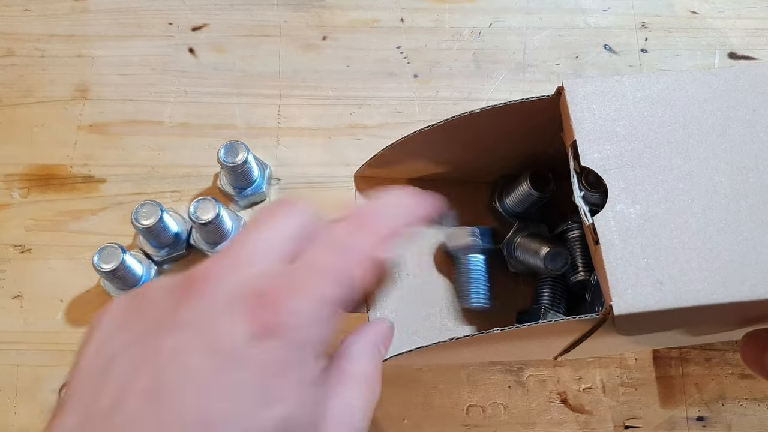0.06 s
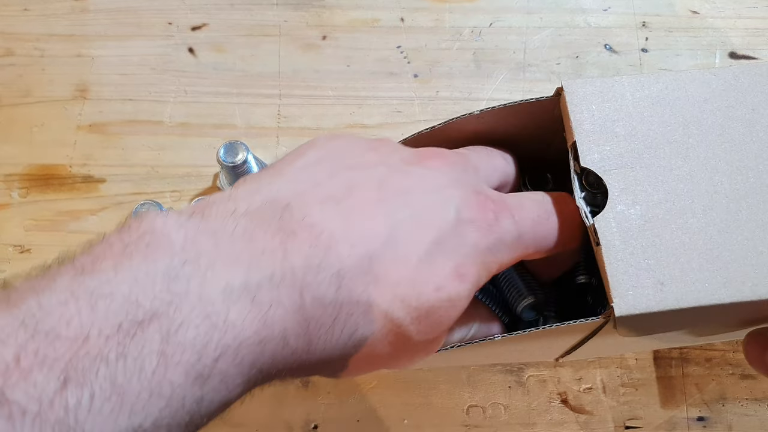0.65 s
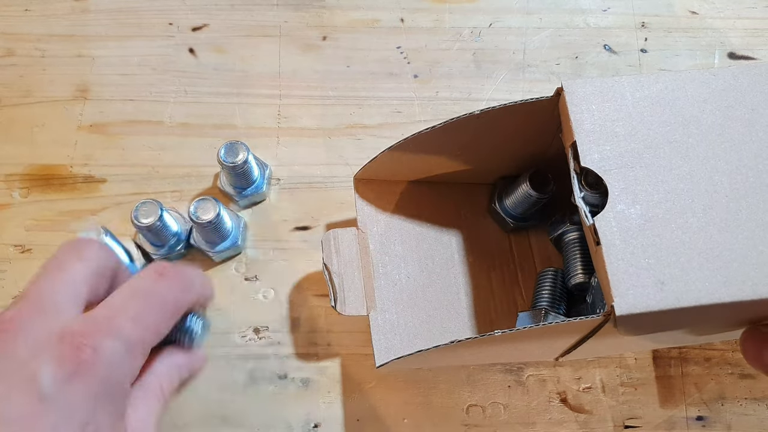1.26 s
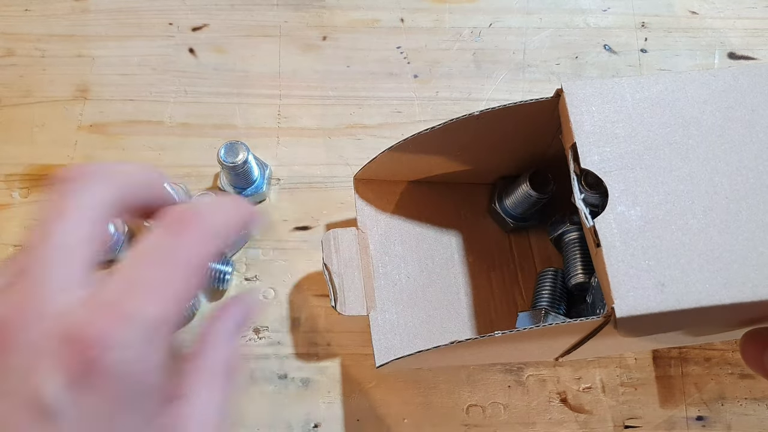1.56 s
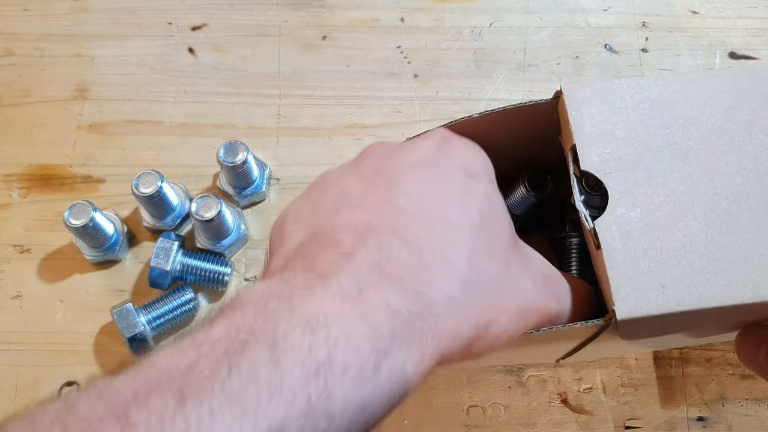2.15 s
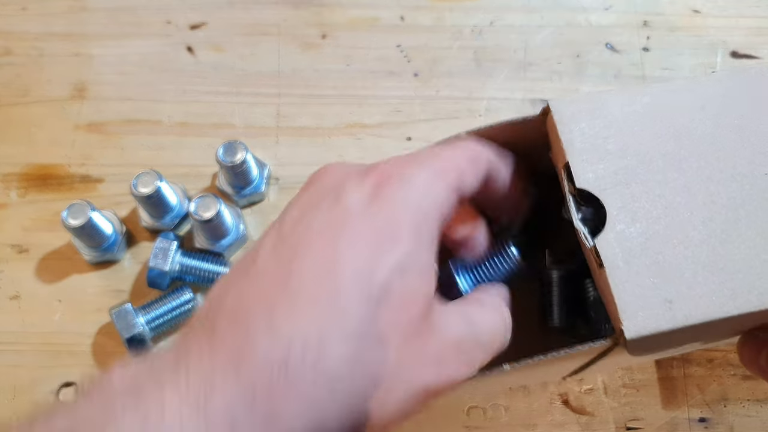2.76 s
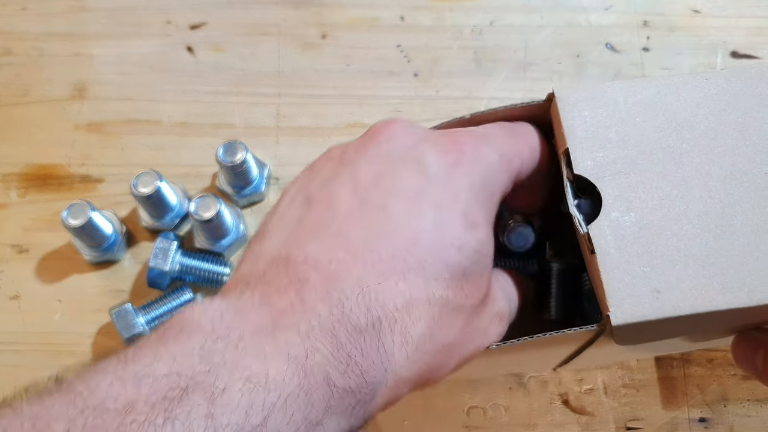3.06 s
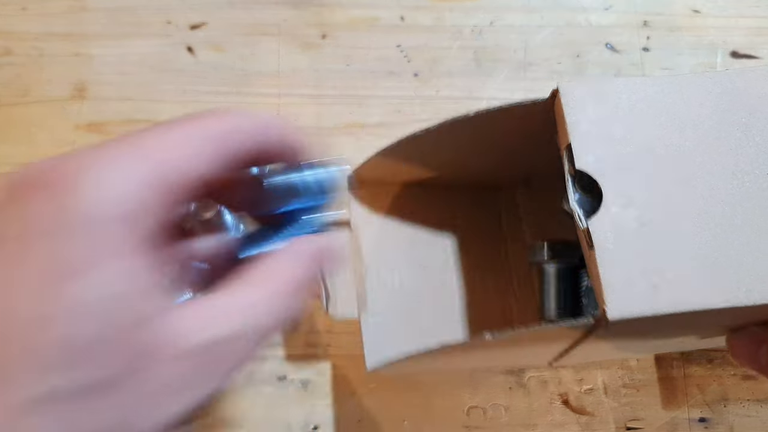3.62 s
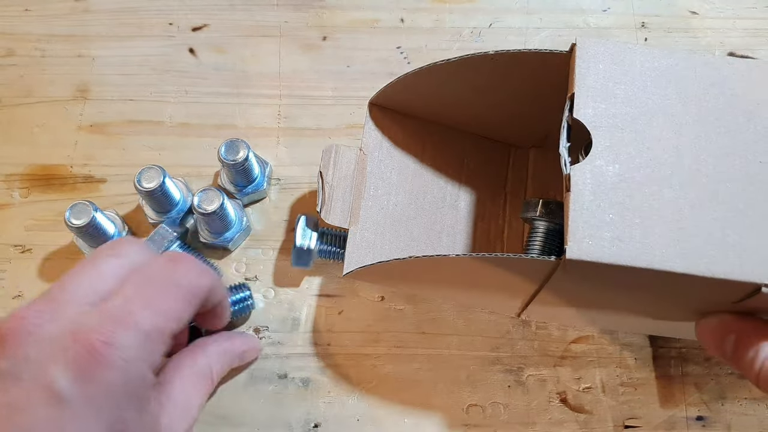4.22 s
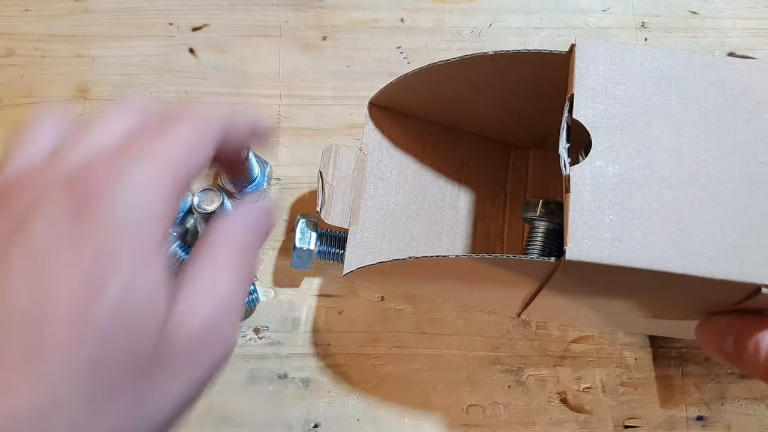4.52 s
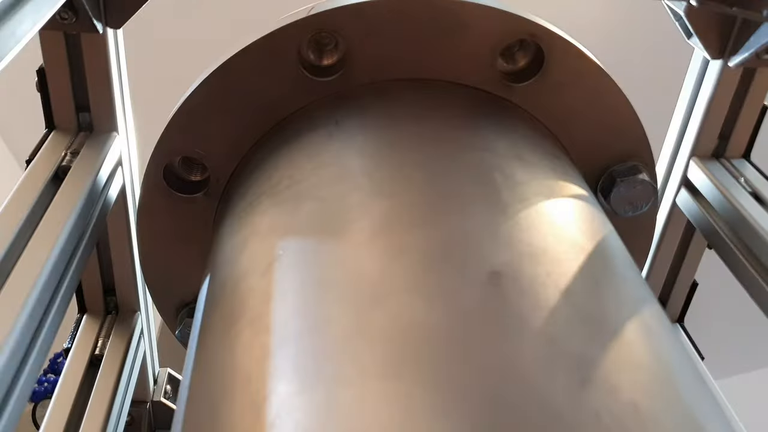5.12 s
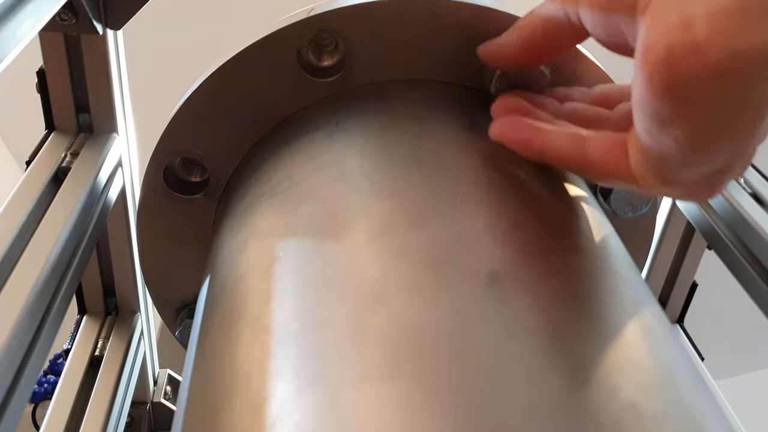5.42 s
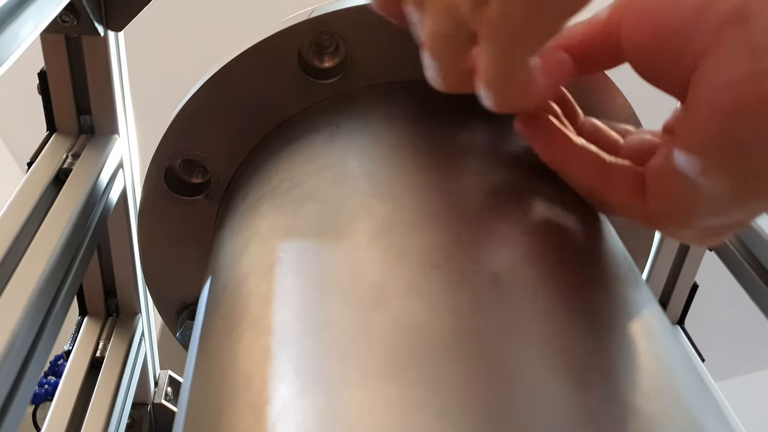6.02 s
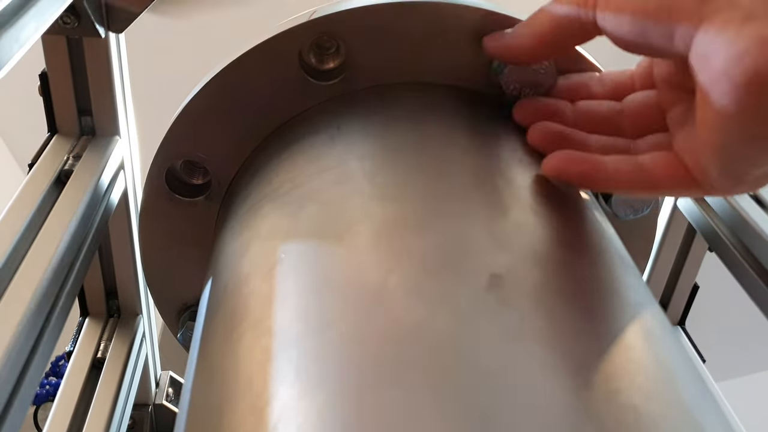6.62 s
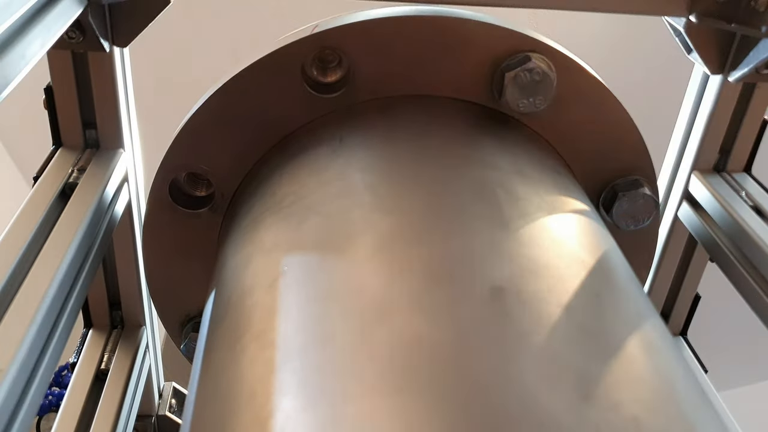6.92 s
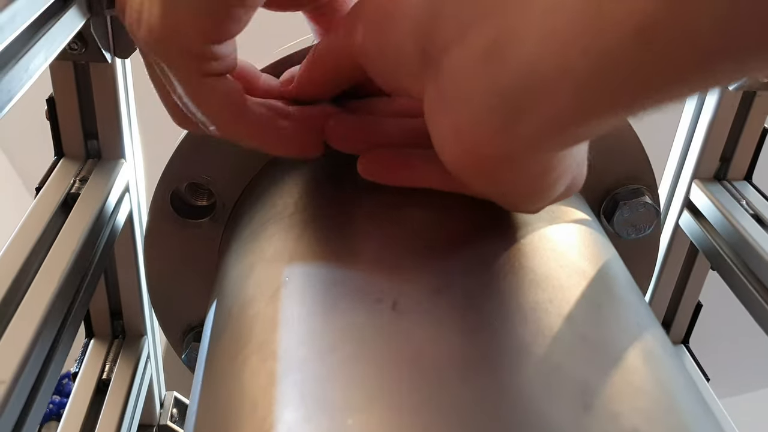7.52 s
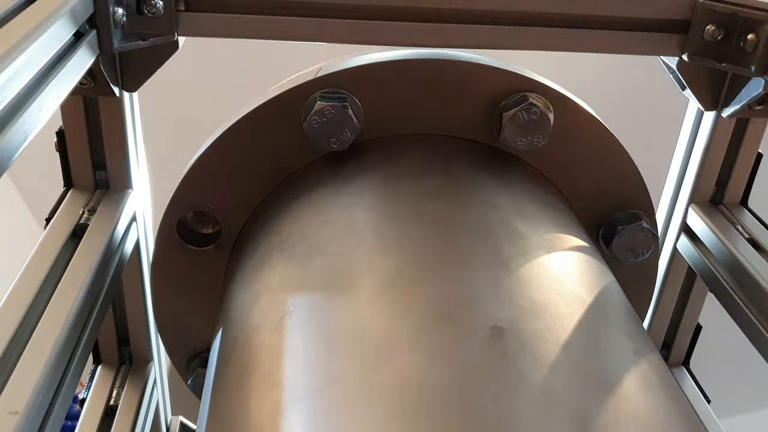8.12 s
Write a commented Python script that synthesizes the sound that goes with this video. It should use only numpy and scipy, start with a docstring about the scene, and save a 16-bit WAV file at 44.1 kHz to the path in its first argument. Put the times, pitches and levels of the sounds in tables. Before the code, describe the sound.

Heard close up in stereo, steel bolts scrape on cardboard and knock together as they are picked from a box, then thud onto a wooden workbench in two batches. Next, fingers screw a bolt into a steel flange: the dry thread rasps, rings the metal lightly and gives short, high squeaks as it sticks and slips. The quiet workshop sound ends on a split second of cordless drill whine.

```python
"""A quiet workshop, a stereo microphone close to the wooden bench.
A hand rummages for steel bolts in a cardboard box: they scrape and clack, the box walls rumble.
Set down, the bolts thud and ring the bench. Then one is turned by hand into a steel flange:
its thread rasps, rings the flange and squeaks as it sticks and slips.
At the very end a cordless drill starts to whine."""
import sys
import numpy as np
from scipy import signal
from scipy.fft import rfft, irfft, next_fast_len
from scipy.io import wavfile
from scipy.ndimage import uniform_filter1d

SR = 44100
rng = np.random.default_rng(int(sys.argv[2]) if len(sys.argv) > 2 else 0)


def master(y):
    """Save y as 16-bit WAV."""
    cut = np.clip(np.atleast_2d(y).T, -1, 1)
    pcm = np.round(cut * 32767)  # scale
    wavfile.write(sys.argv[1], SR, pcm.astype(np.int16))


N = 364690
TIME = np.arange(N) / SR

# hand strokes, plus the low rumble of a bolt rocking on the bench at 1.66 s:
# start/s, length/s, scrape/dB, rumble/dB, hiss/dB
MOVEMENTS = [(0.021, 0.023, -33, -49, -51), (0.104, 0.095, -33, -45.5, -55),
             (0.203, 0.053, -38, -39.5, -52.5), (0.44, .05, -44.5, -50.5, -74),
             (0.513, .055, -37, -38.5, -52.5), (.635, .12, -33, -40.5, -50.5),
             (0.847, .14, -37.5, -46, -53), (1.112, 0.016, -50, -52, -66.5),
             (1.357, 0.057, -48.5, -38, -67), (1.531, .08, -46.5, -49.5, -72), (1.66, .13, -75, -53.5, -94),
             (1.879, 0.19, -43, -45, -54.5), (2.177, .18, -43.5, -43, -61), (2.42, .2, -35, -41, -58),
             (2.64, 0.17, -37.5, -34, -49), (2.877, .15, -43.5, -39, -54.5), (3.079, .3, -44.5, -46, -60.5),
             (3.449, .12, -54.5, -53, -63), (3.665, 0.07, -51, -57, -64), (3.767, .16, -51.5, -58, -54),
             (4.026, 0.024, -46, -58, -68), (4.131, 0.025, -44, -48, -53.5),
             (4.196, .14, -54, -58.5, -76.5), (4.506, 0.021, -51.5, -58.5, -61.5),
             (4.708, .03, -52.5, -54, -61), (4.895, 0.047, -58, -57, -71.5)]
# likeness of left and right at the microphone: f/Hz, correlation
STEREO_LIKENESS = [(60, 0.97), (200, 0.95), (400, 0.92), (800, .45), (2400, 0.32), (5000, 0.24),
                   (12000, 0.087)]


def rummage(grain_db=4, clump_db=1.5, lump_db=3):
    """Threads catch on cardboard in clumps of tiny slips; skin hisses, box or bench rumbles."""
    # spectra of steel on cardboard, of the low rumble and of sliding skin: f/Hz, level/dB
    scrape_colour = [(150, -30.5), (350, -16), (680, -8.5), (1100, -1.5), (1650, -2), (2400, -3),
                     (3500, -4.5), (6000, -20.5), (12000, -39.5)]
    rumble_colour = [(20, -10.5), (60, -3.5), (105, 5), (175, -6.5), (250, -7), (360, -1), (500, -16.5),
                     (680, -2), (1400, -40.5)]
    hiss_colour = [(2000, -21.5), (5000, -1.5), (8000, -5), (12000, -9), (16000, -10.5)]
    scrape_db, rumble_db, hiss_db = movement_levels()
    pressure = np.clip((scrape_db + 63) / 20, 0, 1)  # a light touch slides smoothly
    slips = amp(pressure * (grain_db * wander(N, 900) + clump_db * wander(N, 70)))
    slips /= np.sqrt(uniform_filter1d(slips ** 2, size=8000))
    scrape = evened(hollow(coloured(noise(N) * slips, scrape_colour)))
    rumble = evened(coloured(noise(N) * amp(lump_db * wander(N, 50)), rumble_colour))
    hiss = evened(coloured(noise(N) * np.sqrt(slips), hiss_colour))
    return amp(scrape_db + .5) * scrape + amp(rumble_db + .5) * rumble + amp(hiss_db + 3.5) * hiss


def movement_levels(rise_db_per_s=648.5, fall_db_per_s=270, sag_db=0.5):
    """Scrape, rumble and hiss in dB: a movement sets in fast, holds nearly level and dies away."""
    start, length, *levels = np.transpose(MOVEMENTS)[:, :, None]
    t = TIME[::64]
    arch = np.sin(np.pi * np.clip((t - start) / length, 0, 1)) - .5
    before, after = np.maximum(start - t, 0), np.maximum(t - start - length, 0)
    shape_db = -sag_db * arch - rise_db_per_s * before - fall_db_per_s * after
    return [np.interp(TIME, t, (db + shape_db).max(0)) for db in levels]


def hollow(x, patch_db=3.5):
    """The moving hand keeps reshaping the cavity of the box, so its resonances come and go."""
    spectra = signal.stft(x, SR, nperseg=1024, noverlap=768)[2]
    patches = uniform_filter1d(rng.standard_normal(spectra.shape[1:]), size=4, axis=0)
    patches = evened(uniform_filter1d(patches, size=16, axis=1))
    return signal.istft(spectra * amp(patch_db * patches), SR, nperseg=1024, noverlap=768)[1][:, :N]


def clacks():
    """Bolts knock together, well damped: a dry clack, a low thump and a steel tick."""
    # bolts knocking together; the last is a lone steel click before the threading starts:
    # t/s, clack/dB, thump/dB, tick/dB
    knocks = [(0.138, -24.5, -59, -52), (.18, -19.5, -29.5, -19), (0.4438, -26.5, -55, -51),
              (.48, -30.5, -29.5, -40.5), (0.5238, -21, -44, -36), (0.6735, -6.5, -48.5, -26.5),
              (0.711, -11.5, -57, -40), (.7411, -20.5, -49, -36), (0.95, -13.5, -37, -36.5),
              (0.9623, -13, -29.5, -56), (0.9693, -12.5, -53.5, -34), (1.923, -21.5, -30.5, -42.5),
              (2.175, -23.5, -35, -40), (2.2279, -23, -23.5, -36), (2.3288, -26.5, -30, -38),
              (2.4007, -18.5, -29, -35), (2.4592, -18, -54, -38), (2.4999, -18, -20, -56),
              (2.567, -16, -36.5, -37), (2.6459, -19, -17, -22), (2.6599, -25, -20.5, -30),
              (2.759, -20, -21, -48), (2.9464, -20.5, -27.5, -57), (3.02, -26, -20, -36),
              (3.1024, -18, -32.5, -33), (3.211, -26.5, -23, -50), (3.3375, -23.5, -32, -38),
              (5.0454, -24, -41, -22.5)]
    clack_colour = [(300, -23), (800, -5), (1600, -1), (2300, 0), (3500, -3), (6000, -18),
                    (12000, -45.5)]
    thump_colour = [(35, -14.5), (100, 4), (170, -8), (350, 2.5), (700, -2), (1300, -9.5), (3000, -46)]
    tick_colour = [(2000, -28.5), (4500, -4.5), (6300, 0.5), (10000, -11), (16000, -22.5)]
    out, t = np.zeros((2, N)), np.arange(SR // 5) / SR
    for s, clack_db, thump_db, tick_db in knocks + jostles():
        clack = burst(t, clack_colour, t60=0.0072, scatter_db=-1.5, scatter_t60=0.095)
        thump = burst(t, thump_colour, t60=0.066, scatter_db=-18, scatter_t60=0.19)
        tick = burst(t, tick_colour, t60=0.0083, scatter_db=-11.5, scatter_t60=0.084)
        add(out, s, amp(clack_db - 7.5) * clack + amp(thump_db - 5) * thump + amp(tick_db - 2) * tick)
    return out


def jostles(per_s=9, spread_db=0.5):
    """Small knocks at random moments of the longer movements, following the level of the scrape."""
    above_scrape_db = np.array([13.5, -4, 6])  # clack, thump, tick
    knocks = []
    for start, length, scrape_db, *_ in MOVEMENTS:
        for _ in range(int(length * per_s)):
            s = start + length * rng.random()
            levels = scrape_db + above_scrape_db + spread_db * rng.uniform(-1, 1, 3)
            knocks.append((s, *levels))
    return knocks


def landings(spread_db=2, phase_spread=0.37, attack_s=0.00056):
    """Bolts thud into the bench and ring it; a hard blow reaches the upper modes, and steel ticks."""
    # bolts landing on the bench: t/s, thud/dB, knock/dB, tick/dB
    blows = [(1.339, -19, -23.5, -48), (1.35, -19, -27, -40.5), (1.414, -27, -44, -56),
             (1.48, -12.5, -25.5, -41.5), (1.519, -26, -51, -35.5), (1.558, -16, -32, -32.5),
             (1.595, -22, -45, -57), (3.986, -28.5, -29.5, -36), (4.123, -21, -38, -29),
             (4.167, -12.5, -11, -37), (4.212, -8.5, -12.5, -45), (4.255, -16.5, -19.5, -56),
             (4.28, -22.5, -36, -64), (4.322, -13.5, -17.5, -51)]
    # modes of the wooden bench: f/Hz, level/dB, t60/s
    bench_modes = [(104, -7, .25), (242, -7, .14), (300, -5, .17), (345, -1, .14), (366, -4, .27),
                   (485, -4, .12), (600, -4, .17), (672, -3, .17), (719, 0, .19), (868, -6, .16),
                   (914, -5, .17), (1096, -4, .14), (1360, -10, .12), (1621, -12, .12), (2040, -16, .12)]
    push_colour = [(40, -23.5), (100, -4.5), (190, -2.5), (380, 2), (650, -7.5), (1200, -23.5),
                   (3000, -54)]
    crack_colour = [(150, -11.5), (500, 6), (1100, 7), (2000, -8), (3500, -17.5), (8000, -44.5)]
    tick_colour = [(1500, -12.5), (3500, 3), (6000, 3), (8300, -2.5), (10500, -12.5), (16000, -31.5)]
    out, t = np.zeros((2, N)), np.arange(SR // 2) / SR
    hz, db, t60 = np.transpose(bench_modes)[:, :, None]
    upper = hz[:, 0] > 690
    envelope = amp(-60 * t / t60) * (1 - np.exp(-t / attack_s))
    for s, thud_db, knock_db, tick_db in blows:
        contact = amp(db + spread_db * rng.standard_normal(hz.shape)) * rng.choice([-1, 1], hz.shape)
        phase = phase_spread * rng.standard_normal((2, len(hz), 1)) * np.sqrt(hz / 700)
        rings = contact * envelope * np.sin(2 * np.pi * hz * t + phase)
        push = burst(t, push_colour, t60=0.055, scatter_db=-11, scatter_t60=0.24)
        crack = burst(t, crack_colour, t60=0.027, scatter_db=-4.5, scatter_t60=0.23)
        tick = burst(t, tick_colour, t60=0.011, scatter_db=-5.5, scatter_t60=0.23)
        thud = amp(-7.5) * peaked(rings[:, ~upper].sum(1)) + amp(-4.5) * push
        knock = amp(-10) * peaked(rings[:, upper].sum(1)) + amp(-1.5) * crack
        add(out, s, amp(thud_db) * thud + amp(knock_db) * knock + amp(tick_db + 2.5) * tick)
    return out


def rasps(grain_db=4, drag_db=-62, drag_s=0.11):
    """Each catch of the thread is a swell of tiny slips; afterwards the bolt slides on lightly."""
    # the thread catching hard in the flange: t/s, level/dB, length/s, tilt/(dB per octave)
    catches = [(5.095, -42, 0.023, 16), (5.157, -57, 0.029, 7), (5.268, -18, 0.015, 4.5),
               (5.301, -36, 0.013, -3), (5.325, -25, 0.0082, -1.5), (5.348, -41, 0.012, -3),
               (5.397, -45, .02, 0), (5.445, -53, 0.016, 8.5), (5.535, -53, 0.013, -14.5),
               (5.599, -44.5, 0.016, -3.5), (5.638, -37, 0.021, -2), (5.7, -36, 0.014, -6.5),
               (5.845, -46, 0.0088, 0.5), (5.92, -31, 0.011, 8), (5.97, -45, 0.07, -5),
               (6.102, -39.5, 0.041, -.5), (6.135, -42.5, 0.06, -3), (6.198, -49, 0.018, -2.5),
               (6.254, -42, 0.0092, -6), (6.321, -51, 0.016, -1), (6.397, -43, 0.0092, -4.5),
               (6.451, -41, 0.026, 3.5), (6.528, -53, 0.011, 3), (6.585, -45.5, 0.01, 2),
               (6.67, -43.5, 0.014, -2), (6.752, -47, 0.033, -2), (7.073, -31, 0.023, 0.5),
               (7.115, -41, 0.016, -4), (7.144, -41, .018, 7.5), (7.231, -47, 0.0085, -11.5),
               (7.341, -40, 0.015, 0), (7.434, -30.5, 0.013, -2), (7.624, -50, 0.013, 1),
               (7.773, -35.5, .009, 2.5), (7.806, -35.5, 0.031, -0.5), (7.846, -39.5, 0.0074, -4.5),
               (7.894, -33, 0.02, -3.5), (7.951, -36.5, 0.021, -2.5), (7.98, -38, 0.023, -6.5),
               (7.994, -25, 0.014, 8.5), (8.067, -40, .009, 1.5)]
    out, t = np.zeros((2, N)), np.arange(-SR // 10, SR // 5) / SR
    for s, db, length, tilt in catches:
        slips = wide_noise(len(t)) * swell(t, length) * amp(grain_db * wander(len(t), 1200))
        rasp = peaked(tilted(flange(slips), tilt), size=350)
        slide = wide_noise(len(t)) * swell(t, drag_s) * (t > 0) * amp(grain_db * wander(len(t), 100))
        drag = peaked(coloured(flange(slide), [(1300, -2.5), (12000, -18.5)]))
        add(out, s + t[0], amp(db + 2.5) * rasp + amp(drag_db) * drag)
    return out


def turning(fade_s=0.012, jerks_per_s=59.35, jerk_db=10, grain_db=4, squeal_above=0.17, rub_db=-66.5):
    """Fingers turn the bolt: the thread scrapes finely in jerks and sings only in the harder ones."""
    # turns of the bolt: start/s, end/s, scrape/dB, squeal/dB
    turns = [(5.343, 5.468, -54, -51), (5.517, 5.73, -57.5, -61), (5.82, 6.046, -54.5, -50),
             (6.07, 6.283, -54, -51), (6.38, 6.852, -59.5, -72), (7.259, 7.461, -52.5, -53),
             (7.552, 7.735, -52.5, -54), (7.728, 8.042, -43.5, -43.5)]
    # dull rub of the fingers on the pipe: f/Hz, level/dB
    rub_colour = [(30, -10.5), (110, -2), (250, -6), (600, -13.5), (1500, -27.5)]
    out, t = np.zeros((2, N)), np.arange(SR // 2) / SR
    for start, end, scrape_db, squeal_db in turns:
        grip = np.clip(np.minimum(t, end - start - t) / fade_s + .5, 0, 1)
        jerks = np.tanh(wander(len(t), jerks_per_s))
        slips = wide_noise(len(t)) * amp(jerk_db * jerks + grain_db * wander(len(t), 1200))
        scrape = evened(tilted(flange(slips), db_per_octave=-4))
        squeal = evened(panned(singing(t) * np.maximum(jerks - squeal_above, 0), left_db=4))
        rub = evened(coloured(noise(len(t)), rub_colour))
        add(out, start, grip * (amp(scrape_db) * scrape + amp(squeal_db) * squeal + amp(rub_db) * rub))
    return out


def flange(slips, spread_db=2.8):
    """Slips ring the flange, with another mix of modes at every point of contact."""
    # modes of the steel flange: f/Hz, width/Hz, level/dB
    steel_modes = [(581, 18, -7), (700, 22, -10), (1003, 14, -12), (1283, 18, 3), (1630, 40, -9),
                   (2145, 40, 0), (2425, 30, -5), (2575, 32, -5), (3040, 50, 1), (3135, 40, 1),
                   (3190, 26, 0), (3820, 42, -3), (4060, 34, -7), (4260, 16, 0), (4680, 50, -8),
                   (4925, 55, -7), (5240, 46, -14), (6440, 140, -11), (8390, 130, -12), (10880, 86, -21),
                   (12620, 190, -8)]
    # broad rasp beside the modes: f/Hz, level/dB
    rasp_colour = [(250, -35.5), (520, -22.5), (900, -22), (1400, -16), (3200, -8.5), (5000, -14),
                   (7000, -22.5), (12000, -29), (14000, -47), (16000, -51)]
    hz, width, db = np.transpose(steel_modes)[:, :, None]
    width = width + 22 * hz / 2500  # the fingers damp the high modes most
    contact = amp(db + spread_db * rng.standard_normal(hz.shape)) * rng.choice([-1, 1], hz.shape)
    modes = contact / (1 + 2j * (bins(slips) - hz) / width)
    return irfft(rfft(slips) * modes.sum(0), slips.shape[-1]) + coloured(slips, rasp_colour)


def squeaks(length_s=0.014, skirt_db=-28):
    """Short swells of the singing thread, each thrown more to one side of the microphone."""
    # the thread sticking and slipping loudly: t/s, level/dB, left minus right/dB
    stick_slips = [(5.107, -23, -5), (5.398, -23, 11), (5.44, -37, 1), (5.849, -24, 13), (5.935, -29, 6),
                   (5.975, -25, 3), (6.105, -31, 3), (6.136, -29, -3), (6.27, -30.5, 2), (6.59, -31, 7),
                   (6.671, -36.5, 12), (7.353, -40, 6), (7.395, -37.5, 7), (7.604, -38, 10),
                   (7.693, -40, 1), (7.776, -32, 8.5), (7.817, -26, 7), (7.851, -34, 14), (7.893, -30, 5),
                   (7.999, -20.5, 13)]
    out, t = np.zeros((2, N)), np.arange(-SR // 12, SR // 12) / SR
    grip = swell(t, length_s) + amp(skirt_db) * swell(t, 3 * length_s)
    for s, db, left_db in stick_slips:
        add(out, s + t[0], amp(db - 2) * peaked(panned(singing(t) * grip, left_db), size=350))
    return out


def singing(t, hz=12560, spread_hz=22, glide_hz=50, beat_hz=160, weaker_db=-5, fuzz_db=-8):
    """The dry thread sings on two close, beating modes, either of which may lead."""
    lag = np.array([[0], [0.27 * rng.choice([-1, 1])]])  # cycles between left and right
    cycles = np.cumsum(hz + spread_hz * rng.standard_normal() + glide_hz * wander(len(t), 120)) / SR
    lower_gain, upper_gain = rng.permutation([1, amp(weaker_db)])
    lower = lower_gain * np.sin(2 * np.pi * (cycles + lag))
    upper = upper_gain * np.sin(2 * np.pi * (cycles + beat_hz * t - lag + rng.random()))
    return (lower + upper) * (1 + amp(fuzz_db) * wander(len(t), 800))


def bumps():
    """The hand bumps against box and pipe with dull, soft-edged thumps."""
    # soft touches: t/s, level/dB, length/s, f/Hz
    touches = [(2.6, -26.5, 0.044, 740), (3.271, -29, .04, 151.6), (6.753, -46, 0.042, 94),
               (8.169, -40.5, 0.016, 390), (8.253, -51, 0.15, 108)]
    out, t = np.zeros((2, N)), np.arange(-SR // 10, SR // 10) / SR
    for s, db, length, hz in touches:
        colour = [(hz / 4, -20), (hz, 0), (hz * 1.14, -3), (hz * 4, -35)]
        thump = coloured(noise(len(t)) * swell(t, length), colour)
        add(out, s + t[0], amp(db) * peaked(thump))
    return out


def drill(start_s=8.195, whirr_db=-43, fade_db_per_s=122, whine_hz=11400, whine_db=-58):
    """The drill starts with a fading whirr under the thin, steady whine of its motor drive."""
    # whirr of the drill: f/Hz, level/dB
    whirr_colour = [(200, -12), (1000, -13), (2200, -3.5), (5000, 0), (8000, -8), (11000, -11),
                    (14000, -34)]
    out, t = np.zeros((2, N)), np.arange(SR // 10) / SR
    whirr = evened(coloured(noise(len(t)), whirr_colour)) * amp(whirr_db - fade_db_per_s * t)
    whine = evened(np.sin(2 * np.pi * whine_hz * t)) * amp(whine_db)
    add(out, start_s, whirr + whine)
    return out


def holding(end_s=5, db=-59.5, lump_db=3):
    """A faint, uneven rumble from the other hand, which steadies the box."""
    # rumble of the held box: f/Hz, level/dB
    held_colour = [(20, 1.5), (50, 1), (110, -5), (200, -17), (400, -21), (1000, -43)]
    lumps = noise(N) * amp(lump_db * wander(N, 19))
    return evened(coloured(lumps, held_colour)) * amp(db) * (TIME < end_s)


def room(x):
    """The workshop returns sparse reflections whose treble dies first."""
    # decay of the workshop: f/Hz, t60/s
    decay = [(100, 0.93), (400, 0.38), (1500, 0.33), (4000, 0.2), (12000, 0.13)]
    taps = rng.standard_normal((2, SR)) * (rng.random((2, SR)) < .08) * (np.arange(SR) > .005 * SR)
    hz, t, spectra = signal.stft(taps, SR, nperseg=256)
    tail = signal.istft(spectra * amp(-60 * t / read(decay, hz)[:, None]), SR, nperseg=256)[1]
    same = np.clip(read(STEREO_LIKENESS, bins(tail)), -1, 1)
    left, unrelated = rfft(tail)
    tail = irfft([left, same * left + np.sqrt(1 - same ** 2) * unrelated])
    return signal.fftconvolve(x, tail / np.linalg.norm(tail[0]), axes=1)[:, :N]


def air(db=-68):
    """The steady, low room tone of the workshop."""
    # room tone: f/Hz, level/dB
    air_colour = [(20, -12), (60, -6), (110, -1.5), (180, -9.5), (600, -14), (1200, -22), (4000, -30),
                  (8000, -33.5), (16000, -48.5)]
    return amp(db) * evened(coloured(noise(N), air_colour))


def burst(t, spectrum, t60, scatter_db, scatter_t60, uneven_db=3, snap_db=7, snap_t60=0.0016):
    """A snap, a short rattle, then weaker scatter from close by; each contact has its own colour."""
    snap = amp(snap_db - 60 * t / snap_t60)
    rattle = amp(-60 * t / t60)
    scatter = amp(scatter_db - 60 * t / scatter_t60)
    hz = np.geomspace(30, 16000, 90)
    colour = np.column_stack([hz, read(spectrum, hz) + uneven_db * rng.standard_normal(len(hz))])
    return peaked(coloured(noise(len(t)) * (snap + rattle + scatter), colour))


def noise(size):
    """Stereo noise, alike on both sides in the bass and unrelated in the treble."""
    white = rng.standard_normal((2, size))
    same = np.clip(read(STEREO_LIKENESS, bins(white)), -1, 1)
    mid, side = irfft(rfft(white) * np.sqrt([(1 + same) / 2, (1 - same) / 2]), size)
    return np.array([mid + side, mid - side])


def wide_noise(size):
    """Noise that is unrelated on the two sides, as from a wide steel surface."""
    return rng.standard_normal((2, size))


def wander(size, hz):
    """A random curve of rms 1 with hz knots a second."""
    knots = rng.standard_normal(int(size * hz / SR) + 3)
    return evened(np.interp(np.arange(size) * hz / SR, np.arange(len(knots)), knots))


def swell(t, length):
    """A bell curve that stays above half height for the given length."""
    return .5 ** ((2 * t / length) ** 2)


def coloured(x, points):
    """Minimum-phase filter through points of f/Hz, level/dB."""
    size = next_fast_len(x.shape[-1] + 2048)
    log_gain = np.log(amp(read(points, abs(np.fft.fftfreq(size, 1 / SR)))))
    response = np.exp(np.conj(signal.hilbert(log_gain)))[:size // 2 + 1]
    return irfft(rfft(x, size) * response, size)[..., :x.shape[-1]]


def tilted(x, db_per_octave):
    """Brightens or dulls a sound around 3 kHz."""
    return coloured(x, [(f, db_per_octave * np.log2(f / 3000)) for f in (600, 9000)])


def read(points, hz):
    """Reads a table on a log-frequency axis."""
    f, value = np.transpose(points)
    return np.interp(np.log(hz + 1), np.log(f + 1), value)


def bins(x):
    """Frequencies of the spectrum of x."""
    return np.fft.rfftfreq(x.shape[-1], 1 / SR)


def amp(db):
    """Decibels to gain."""
    return 10 ** (np.asarray(db) / 20)


def evened(x):
    """Scales to rms 1."""
    return x / np.sqrt(np.mean(x ** 2) + 1e-20)


def peaked(x, size=220):
    """Scales a stereo sound so that its loudest few milliseconds have rms 1."""
    return x / np.sqrt(uniform_filter1d((x ** 2).mean(0), size).max() + 1e-20)


def panned(x, left_db):
    """Makes the left side louder than the right by left_db."""
    return x * amp([[left_db / 2], [-left_db / 2]])


def add(mix, s, sound):
    """Mixes a sound in at time s."""
    part = mix[:, max(round(s * SR), 0):][:, :sound.shape[1]]
    part += sound[:, :part.shape[1]]


def scene():
    """Bolts, bench, thread and drill close up, with faint reflections and room tone behind them."""
    handling = rummage() + holding() + clacks()
    bench = landings()
    thread = rasps() + turning() + bumps()
    squeal = squeaks()
    to_room = amp(-16) * handling + amp(-17.5) * bench + amp(-20) * thread + amp(-41) * squeal
    return handling + bench + thread + squeal + air() + drill() + room(to_room)


def record(dry, edge_hz=16100):
    """The close stereo microphone rolls off at both ends; a steep low-pass limits the band."""
    # response of the microphone: f/Hz, level/dB
    response = [(20, -7), (45, 0), (12800, -0.5), (14200, -6), (16000, -8)]
    low_pass = signal.firwin(511, edge_hz, window=("kaiser", 9), fs=SR)
    return signal.oaconvolve(coloured(dry, response), low_pass[None], "same")


dry = scene()
out = record(dry)
master(out)
```